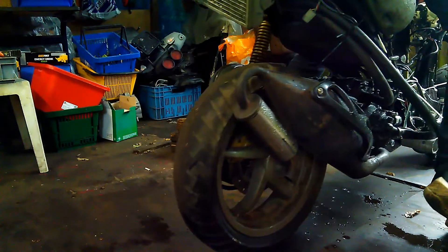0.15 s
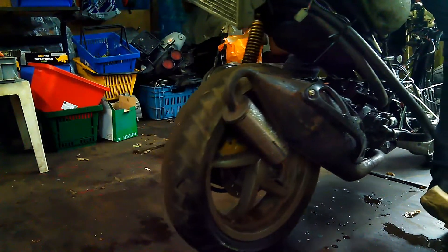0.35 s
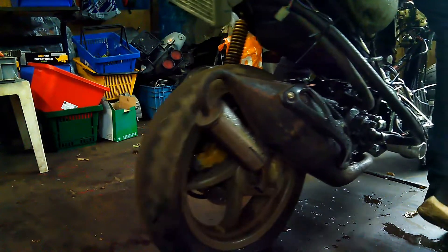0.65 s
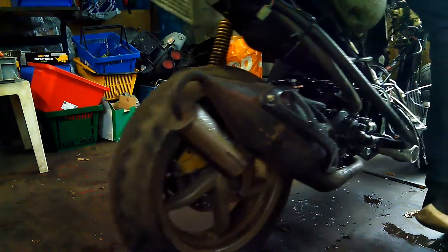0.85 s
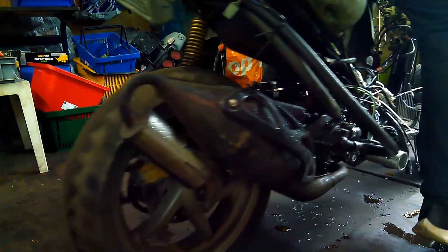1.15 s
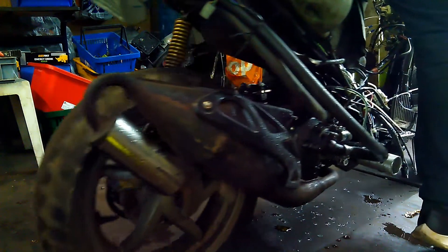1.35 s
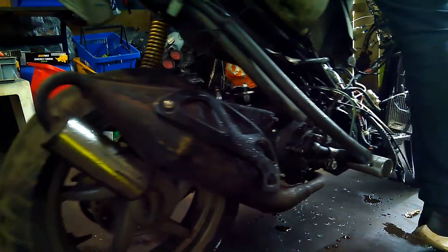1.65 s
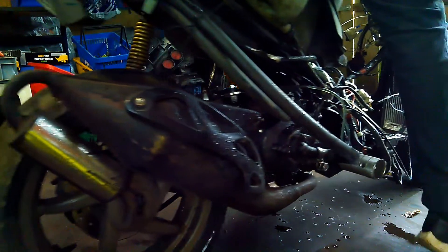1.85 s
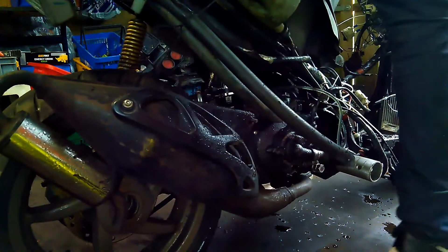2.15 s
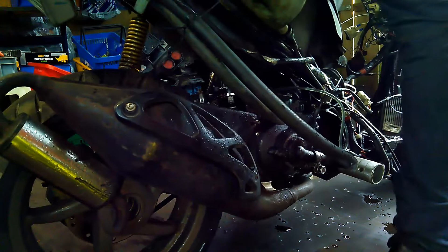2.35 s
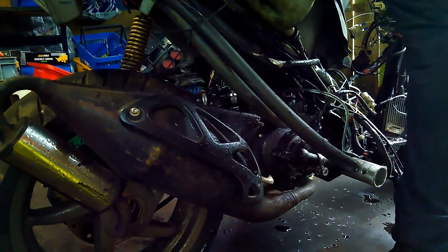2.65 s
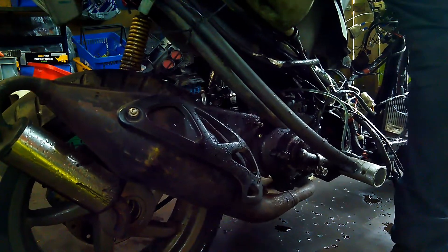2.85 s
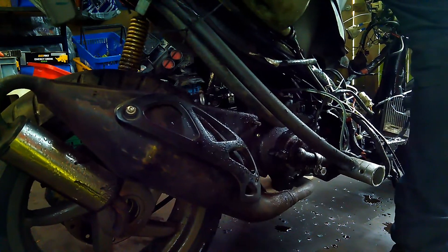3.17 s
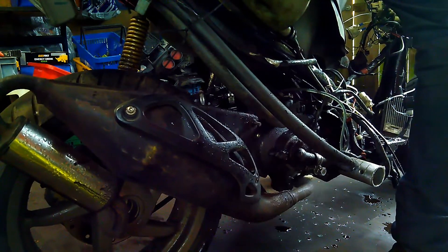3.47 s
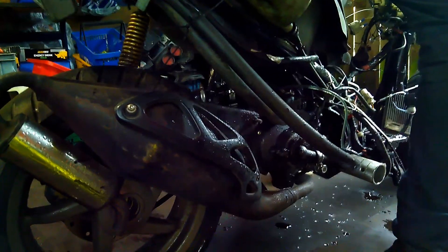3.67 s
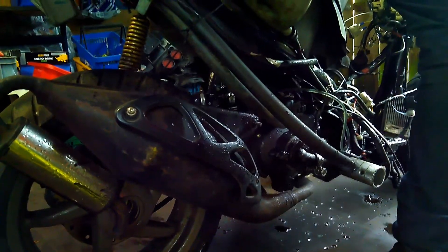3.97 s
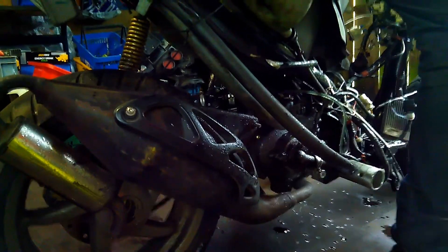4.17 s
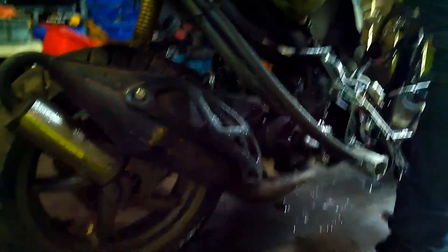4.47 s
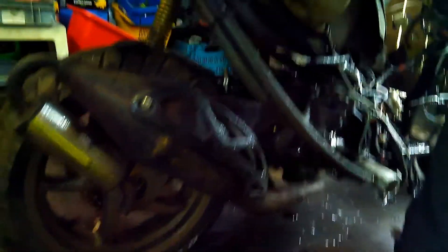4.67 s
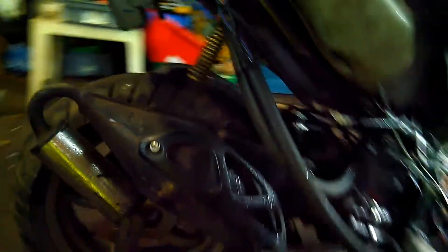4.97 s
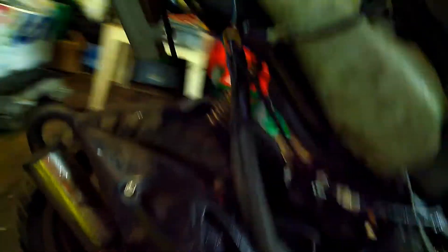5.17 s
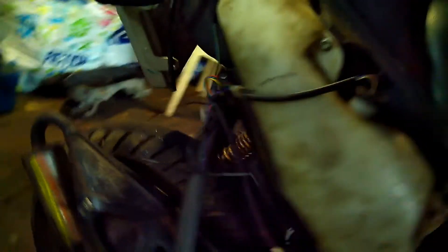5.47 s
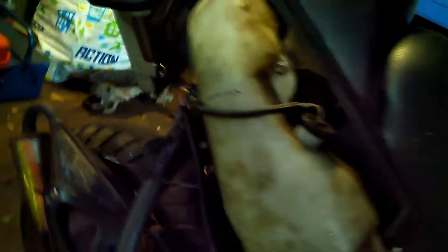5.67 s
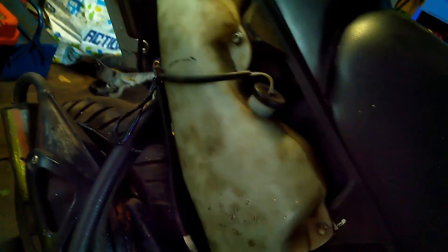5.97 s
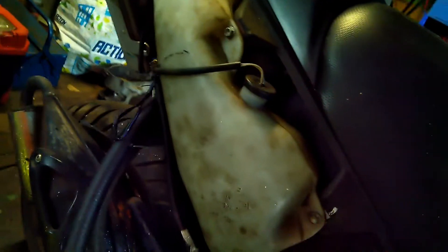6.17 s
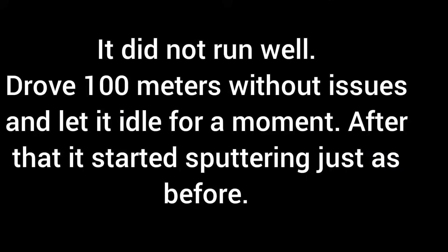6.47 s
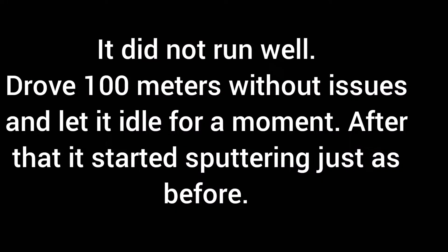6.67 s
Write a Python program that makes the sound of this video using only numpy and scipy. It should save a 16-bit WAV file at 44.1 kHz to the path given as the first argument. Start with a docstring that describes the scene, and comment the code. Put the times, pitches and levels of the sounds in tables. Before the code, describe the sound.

Rapid exhaust popping and metallic ticking from an idling scooter, growing closer and more clattery, with faint handling thuds before an abrupt cut to silence.

```python
"""Idling two-stroke scooter engine

A small engine drops from a blip of throttle into a hunting idle, heard by a moving hand-held camera.
Each crank turn puffs the exhaust, knocks the casing, slaps the piston and ticks the loose parts; each blow
is a sharp push that rings the body it hits, over a steady rattle of noise through the same resonances.
Fingers bump the camera and something brushes past. The right microphone is open, the left muffled and faint.
The sound is cut off while the engine still idles.
"""
import sys
import numpy as np
from scipy import signal
from scipy.fft import rfft, irfft, next_fast_len
from scipy.io import wavfile
from scipy.ndimage import uniform_filter1d

SR = 44100
rng = np.random.default_rng(int(sys.argv[2]) if len(sys.argv) > 2 else 0)


def bounce(signal):
    """Save signal as a 16-bit WAV file at the path given by the first command-line argument."""
    frames = np.transpose(np.atleast_2d(signal))
    limited = np.clip(frames, -1, 1)
    pcm = np.round(limited * 32767).astype(np.int16)
    wavfile.write(sys.argv[1], SR, pcm)


N = 300923

# Crank speed, falling from the blip into the idle. Each row: time in seconds, speed in turns per second.
CRANK = [(0.0, 40.33), (0.2, 36.53), (0.28, 33.3), (0.36, 31.44), (0.56, 33.94), (0.76, 32.76),
         (0.84, 31.85), (1.12, 32.13), (1.28, 30.28), (1.4, 31.41), (1.52, 30.78), (2.25, 30.37),
         (2.3, 29.04), (2.36, 30.56), (2.48, 31.09), (2.56, 32.29), (2.64, 33.36), (2.76, 32.21),
         (2.88, 30.79), (3.04, 32.23), (3.12, 33.3), (3.32, 30.44), (3.44, 32.0), (3.6, 31.91),
         (3.68, 30.18), (3.88, 31.88), (4.08, 31.08), (4.16, 30.32), (4.36, 31.45), (4.44, 30.93),
         (4.52, 30.38), (4.84, 30.94), (5.08, 30.3), (5.24, 30.65), (5.32, 31.42), (5.48, 30.14),
         (5.56, 30.44), (5.88, 30.53), (5.99, 29.82), (6.04, 27.32), (6.16, 30.49), (6.27, 31.31)]
# Turns that fire weakly, and the richer ones after. Each row: time in seconds, loss in dB (negative is a gain).
MISFIRES = [(2.268, 6), (2.302, -1), (2.4, 2), (6.003, 8), (6.038, -2), (6.075, -1)]
# Camera moves. Each row: time in seconds, closeness to the casing 0-1, swing over the engine 0-1,
# then cylinder, head and silencer levels in dB above the exhaust.
CAMERA = [(0, 0.07, 0, -10.5, -8.5, -8), (.5, 0.03, 0.05, -8, -8, -7), (.9, 0.12, 0.1, -10, -8, -9),
          (1.3, 0.27, 0.01, -6.5, -8.5, -9), (1.65, 0.36, 0.17, -3.5, -9.5, -4),
          (2.0, 0.38, 0.02, -7, -10.5, -11), (2.4, 0.49, 0.03, -6.5, -11.5, -7), (3.2, 0.58, 0, -7, -9, -7),
          (3.95, 0.64, 0, -7, -11, -7.5), (4.7, 0.4, 0.3, -16, -7, -9), (5.1, 0.28, 0.41, -6.5, -4, -11),
          (5.35, 0.2, 0.56, -6.5, -6, -15), (5.6, 0, 0.5, -14, -9, -12), (6.3, 0, 0.55, -9.5, -7.5, -9)]

# Resonances of each body. Each row: pitch in Hz, width in Hz, relative level in dB.
EXHAUST = [(192, 33.6, -6), (233.8, 37.6, -0.5), (286.3, 26, -2.5), (317.2, 48, 0.5), (364.6, 40.7, 1),
           (372, 27, -14.5)]
AFAR = [(177, 24, -11), (228, 38, 0), (287, 40, -4), (335, 40, 0.5), (352, 40, -8)]  # the exhaust from a distance
REVVING = [(348, 49, 0.5), (405, 15, -1), (275, 130, -6.5), (148, 25, -1.5)]  # the exhaust above idle, strongest near 350 Hz
ABOVE = [(243, 20, 0), (372, 45, 1)]  # exhaust notes that swell as the camera swings over
THROB = [(66, 19, 3.5), (87.4, 24, 3.5), (136.6, 13, 3), (159.4, 76, -3.5)]  # the low end of the exhaust
BRACKET = [(640.4, 15, 0)]  # a bracket that sings with the exhaust
SILENCER = [(440, 100, -10), (526, 87, 8.5)]
CASING = [(745, 50, -4), (800, 55, 3), (910, 60, 2.5), (975, 70, -6)]
FRAME = [(654, 110, -3), (947, 390, -5), (1260, 200, -4.5), (1650, 990, -7)]
CYLINDER = [(1847, 140, -5), (1940, 130, -11)]
HEAD = [(2200, 560, -3.5), (2620, 140, -7.5)]
COVER = [(3300, 810, -12.5), (4316, 1280, -2.5), (5250, 900, -9), (5880, 600, -3.5), (6850, 1400, -1.5)]  # belt cover
FINS = [(7560, 230, -4.5), (8213, 680, 1), (9450, 1200, -10)]
SHROUD = [(11120, 1600, -2), (12130, 820, -0.5), (14760, 2100, -9.5)]
TAPPET = [(5890, 280, 0)]
LOOSE_CLIP = [(7040, 1400, 0), (7600, 600, 0.0053)]

# Blows in every turn. Each row: share of the turn, relative level in dB, scatter in dB, decay in ms.
PUFFS = [(0.0977, 6, 0.5, 0.61), (.79, -10, 2, 1), (0.523, -7, 4, 0.94)]
THROBS = [(.53, 0, 1.2, .8)]
PORTS = [(.93, 0, 1.2, .5), (.15, 0, 1.2, .5), (.45, -9, 2, .5)]
KNOCKS = [(.05, 0, .8, .4), (.30, -8, 1.5, .4), (.515, -4, 1, .4), (.93, -9, 1, .4)]
SLAPS = [(.965, 0, 1, .8), (.05, -14, 2, .8), (.83, -10, 3, .8)]
HEAD_SLAPS = [(.96, 0, 1.2, 1.8), (.83, -5, 2, 1.2), (.40, -9, 2, 1.2), (.63, -10, 2, 1.2)]
TICKS = [(.93, -9, 1.5, 1.5), (.96, 0, 1.2, 2.2), (.32, -2.5, 1.5, 2.), (.86, -11, 2, 1.5)]
SHROUD_TICKS = [(.85, -7, 2, 1.8), (.91, -3, 1.5, 1.8), (.96, -1, 1.2, 1.8), (.995, -2, 1.2, 1.8),
                (.33, -10, 3, 1.2)]
TAPS = [(.945, 0, 1.2, .5), (.315, -6, 2, .5)]
SNAPS = [(.335, 0, 2.5, 1.)]

# Mix of each part. Each row: level from afar in dB, gain when close in dB, gain when swung over in dB.
EXHAUST_DB = (-30, 0.38, 1.2)  # sets the whole engine; the parts below are relative to it
ABOVE_DB = (-28.5, -17.5, 25)
THROB_DB = (-8, -4, 0.5)
BRACKET_DB = (-26, 0, 19)
CASING_DB = (-15.5, 17.5, 1)
FRAME_DB = (-6, 3.5, -1.5)
COVER_DB = (-5.5, 2.5, 2)
FINS_DB = (-2.46, 3.2, 3)
SHROUD_DB = (-8, 2.5, 7)
TAPPET_DB = (-22, 17.5, 0.5)
LOOSE_CLIP_DB = (-17, 2, 13)
# How far blows stand out of their rattle, on top of an offset at each part. Each row: the same three, in dB.
SLAPS_DB = (-7, 8, 3)
COVER_TICKS_DB = (-12, 4, 2)
TICKS_DB = (-5.5, 7, 3)
SHROUD_TICKS_DB = (-5, 2, 10)

# Fingers bump the camera body. Each row: start in seconds, level in dB before the decay.
BUMPS = [(3.468, -35), (4.08, -28), (4.13, -28), (5.17, -47.5), (5.43, -41.5), (5.70, -36), (6.166, -33)]
# Something brushes past. Each row: middle in seconds, level in dB, pitch in Hz, width in Hz,
# time to swell and to fade in ms.
SCRAPES = [(4.162, -27, 2100, 1600, 7)]
# The muffled left microphone. Each row: pitch in Hz, level against the right in dB, share of shared sound 0-1.
MUFFLE = [(60, -15.5, 0.76), (110, -26.5, 0.33), (249, -14.5, 0.16), (600, -14, 0.49), (1346, -14, 0.81),
          (2480, -15, 0.33), (4400, -22.5, .05), (8100, -27.5, .02), (12000, -30.5, .02), (14140, -53, .02)]

MISFIRE_S = .012  # half-width of each dip in firing
IDLE_TOP_HZ, REV_HZ = 34, 38  # crank speeds between which the exhaust note changes over
AFAR_FADE = 3.5  # how soon the near note takes over as the camera closes in or swings over
LULL_DB, LULL_AT = 2.2, .68  # rattle swings up and down by this, quietest at this share of the turn
PUFF_JITTER_MS, KNOCK_JITTER_MS, SLAP_JITTER_MS = .04, .03, .06
SPREAD_HZ, SPREAD_WIDTH_HZ = 346, 109  # each puff is held back most near this pitch, across this width
PIPE_STEEP = 2.2  # the pipe's notes fall away more steeply than the metal's
BUMP_HZ, BUMP_DECAY_S = 90, .016
LEFT_LAG_S, FAR_LAG_S = 0.00019, 0.00044
CUT_S, CUT_FADE_S, TOP_HZ = 6.263, 0.00057, 15600


def undb(db):
    """dB to gain."""
    return 10 ** (np.asarray(db) / 20)


def unit(x):
    """Scale to rms 1."""
    return x / np.sqrt(np.mean(x ** 2))


def seen(db, view):
    """A part's level in dB as the camera closes in and swings over."""
    close, over = view
    return db[0] + db[1] * close + db[2] * over


def ring(x, modes, steep, size=16384):
    """A body's resonances summed in power, played as the causal response of least delay."""
    f = np.arange(1, size // 2 + 2) * SR / size
    power = 0
    for hz, width, db in modes:
        detuning = (f ** 2 - hz ** 2) / (f * width)
        power = power + undb(2 * db) / (1 + detuning ** 2) ** steep
    # folding the cepstrum onto positive time gives minimum phase
    cepstrum = irfft(np.log(power) / 2, size)
    cepstrum[1:size // 2] *= 2
    cepstrum[size // 2 + 1:] = 0
    response = irfft(np.exp(rfft(cepstrum)), size)[:size // 2]
    return unit(signal.oaconvolve(np.atleast_2d(x), response[None], axes=1)[:, :N])


def walk(rate):
    """Random levels held 1 / rate seconds and slewed twice, with rms near 1."""
    k = int(SR / rate)
    held = np.repeat(rng.standard_normal(N // k + 1), k)
    return unit(uniform_filter1d(uniform_filter1d(held, k), k)[:N])


def blows(turn, table, jitter_ms, tail_db, tail_ms):
    """Force envelope: each blow of each turn is a sharp push, then loose parts chatter on."""
    t, out = np.arange(N) / SR, np.zeros(N)
    ms_after = np.arange(SR // 20) / SR * 1000
    tail = undb(tail_db) * np.exp(-ms_after / tail_ms)
    for share, db, scatter_db, ms in table:
        chance = rng.standard_normal((int(turn[-1]) + 1, 2))
        s = np.interp(np.arange(len(chance)) + share, turn, t) + jitter_ms / 1000 * chance[:, 0]
        at = np.clip(s * SR, 0, N - 1).astype(int)
        clicks = np.bincount(at, undb(db + scatter_db * chance[:, 1]), N)
        attack = 1 - np.exp(-6 * ms_after / ms)
        out += signal.oaconvolve(clicks, attack * (np.exp(-ms_after / ms) + tail))[:N]
    return out


def struck(force, modes, gritty, rattle_db, lull, steep=1.5):
    """Blows ring a body as clean pushes and grit, over a rattle; two sides share only the clean pushes."""
    clean = (1 - gritty) * ring(np.diff(force, prepend=0), modes, steep)
    push = clean + gritty * ring(force * rng.standard_normal((2, N)), modes, steep)
    rattle = lull * undb(1.5 * walk(120)) * rng.standard_normal((2, N))
    both = unit(push) + undb(rattle_db) * ring(rattle, modes, steep)
    return both / np.sqrt(1 + undb(2 * rattle_db))  # keeps the level steady as the rattle changes


def dispersed(x):
    """All-pass: some pitches are delayed more than others, drawing each puff out."""
    a = signal.iirpeak(SPREAD_HZ, SPREAD_HZ / SPREAD_WIDTH_HZ, SR)[1]
    return signal.lfilter(a[::-1], a, x)


def exhaust(turn, fired, rev, view, lull):
    """Gas puffs ring the pipe, its low throb and a singing bracket; distance and revs change the note."""
    def pipe(force, modes):
        """Puffs drawn out in time, then rung by the pipe's notes."""
        return struck(dispersed(force), modes, .02, -16, lull, PIPE_STEEP)

    puffs = fired * blows(turn, PUFFS, PUFF_JITTER_MS, -41, 5.6)
    throbs = fired * blows(turn, THROBS, PUFF_JITTER_MS, -41, 5.6)
    rev_puffs = blows(turn, PUFFS[:1], PUFF_JITTER_MS, -40.5, 5.0)
    close, over = view
    afar = np.clip(1 - AFAR_FADE * (close + over), 0, 1)
    idle = (1 - afar) * pipe(puffs, EXHAUST) + afar * pipe(puffs, AFAR)
    sound = (1 - rev) * idle + rev * pipe(rev_puffs, REVVING)
    sound += undb(seen(ABOVE_DB, view)) * pipe(puffs, ABOVE)
    sound += undb(seen(THROB_DB, view) - 5 * rev) * struck(throbs, THROB, .02, -11, 1)
    sound += undb(seen(BRACKET_DB, view)) * struck(puffs, BRACKET, .03, -14, lull)
    return sound


def silencer(turn, fired, rev, level_db, lull):
    """Port pulses ring the silencer, which sits lower in the mix above idle."""
    ports = fired * blows(turn, PORTS, KNOCK_JITTER_MS, -22.5, 8.1)
    return undb(level_db - 4 * rev) * struck(ports, SILENCER, .1, -5, lull)


def casing_and_frame(turn, fired, view, lull):
    """Crank knocks ring the casing cleanly and the frame with much more grit."""
    knocks = fired * blows(turn, KNOCKS, KNOCK_JITTER_MS, -16, 8.1)
    sound = undb(seen(CASING_DB, view)) * struck(knocks, CASING, .15, -9, lull, 2.)
    return sound + undb(seen(FRAME_DB, view)) * struck(knocks, FRAME, .8, 1.5, lull, 1.8)


def piston_slap(turn, view, cylinder_db, head_db, lull):
    """The piston slaps the cylinder, and separate slaps ring the head."""
    slaps = blows(turn, SLAPS, SLAP_JITTER_MS, -18.5, 5)
    head_slaps = blows(turn, HEAD_SLAPS, SLAP_JITTER_MS, -18, 5)
    clear_db = seen(SLAPS_DB, view)
    sound = undb(cylinder_db) * struck(slaps, CYLINDER, .08, -10 - clear_db, lull, 1.8)
    return sound + undb(head_db) * struck(head_slaps, HEAD, .45, -4 - .5 * clear_db, lull, 1.8)


def loose_parts(turn, view, lull):
    """Ticks, taps and snaps ring the belt cover, fins, shroud, tappet and a loose clip."""
    ticks = blows(turn, TICKS, SLAP_JITTER_MS, -6, 6)
    shroud_ticks = blows(turn, SHROUD_TICKS, SLAP_JITTER_MS, -12, 5)
    taps = blows(turn, TAPS, SLAP_JITTER_MS, -25, 4)
    snaps = blows(turn, SNAPS, SLAP_JITTER_MS, -14, 4)
    cover_rattle_db = -3 - seen(COVER_TICKS_DB, view)
    fins_rattle_db = -4 - seen(TICKS_DB, view)
    shroud_rattle_db = -3 - seen(SHROUD_TICKS_DB, view)
    # powers below 1 make the lull shallower
    sound = undb(seen(COVER_DB, view)) * struck(ticks, COVER, .85, cover_rattle_db, lull ** .7, 1.8)
    sound += undb(seen(FINS_DB, view)) * struck(ticks, FINS, .65, fins_rattle_db, lull ** .5)
    sound += undb(seen(SHROUD_DB, view)) * struck(shroud_ticks, SHROUD, .7, shroud_rattle_db, lull ** .5)
    sound += undb(seen(TAPPET_DB, view)) * struck(taps, TAPPET, .15, -20, lull, 1.8)
    sound += undb(seen(LOOSE_CLIP_DB, view)) * struck(snaps, LOOSE_CLIP, .5, -20, lull, 1.8)
    return sound


def engine(turn):
    """All parts driven from one crank, on the near and the far side."""
    t = np.arange(N) / SR
    fired = undb(-sum(db * np.exp(-((t - s) / MISFIRE_S) ** 2) for s, db in MISFIRES))
    s, *columns = np.transpose(CAMERA)
    close, over, cylinder_db, head_db, silencer_db = (np.interp(t, s, c) for c in columns)
    view = close, over
    lull = undb(-LULL_DB * np.cos(2 * np.pi * (turn - LULL_AT)))
    crank_hz = np.gradient(turn) * SR
    rev = np.clip((crank_hz - IDLE_TOP_HZ) / (REV_HZ - IDLE_TOP_HZ), 0, 1)
    sound = exhaust(turn, fired, rev, view, lull)
    sound += silencer(turn, fired, rev, silencer_db, lull)
    sound += casing_and_frame(turn, fired, view, lull)
    sound += piston_slap(turn, view, cylinder_db, head_db, lull)
    sound += loose_parts(turn, view, lull)
    return undb(seen(EXHAUST_DB, view)) * sound


def bumps():
    """Dull thuds through the camera body: decaying low sines."""
    out, u = np.zeros(N), np.arange(int(.08 * SR)) / SR
    thud = np.sin(2 * np.pi * BUMP_HZ * u) * np.exp(-u / BUMP_DECAY_S)
    for s, db in BUMPS:
        i = int(s * SR)
        out[i:i + len(u)] += undb(db) * thud
    return out


def scrape():
    """Short brushes of grit: band-shaped noise that swells and fades."""
    out = 0
    for s, db, hz, width, ms in SCRAPES:
        stroke = np.exp(-((np.arange(N) / SR - s) * 1000 / ms) ** 2)
        out = out + undb(db) * stroke * ring(rng.standard_normal(N), [(hz, width, 0)], 2.5)
    return out


def muffled(near, far):
    """The left microphone blends late near and far sound pitch by pitch; its top is nearly all far side."""
    size = next_fast_len(N + SR)
    f = np.arange(size // 2 + 1) * SR / size
    hz, db, same = np.transpose(MUFFLE)
    db, same = (np.interp(np.log(f + 1), np.log(hz), c) for c in (db, same))
    direct = same * np.exp(-2j * np.pi * f * LEFT_LAG_S) * rfft(near, size)
    around = np.sqrt(1 - same ** 2) * np.exp(-2j * np.pi * f * FAR_LAG_S) * rfft(far, size)
    return irfft(undb(db) * (direct + around), size)[:N]


def scene():
    """The engine on both microphones, left then right, with the handling noises."""
    s, hz = np.transpose(CRANK)
    turn = np.cumsum(np.interp(np.arange(N) / SR, s, hz)) / SR
    near, far = engine(turn) + scrape()
    thud = bumps()
    return np.array([muffled(near, far) + undb(-19) * thud, near + thud])


def record(dry):
    """The lowest bass is filtered out, the sound is cut off, and the top is trimmed."""
    lean = signal.sosfilt(signal.butter(2, 30, "high", fs=SR, output="sos"), dry)
    cut = lean * np.clip((CUT_S - np.arange(N) / SR) / CUT_FADE_S, 0, 1)
    return signal.sosfilt(signal.ellip(10, .2, 80, TOP_HZ, fs=SR, output="sos"), cut)


dry = scene()
out = record(dry)
bounce(out)
```